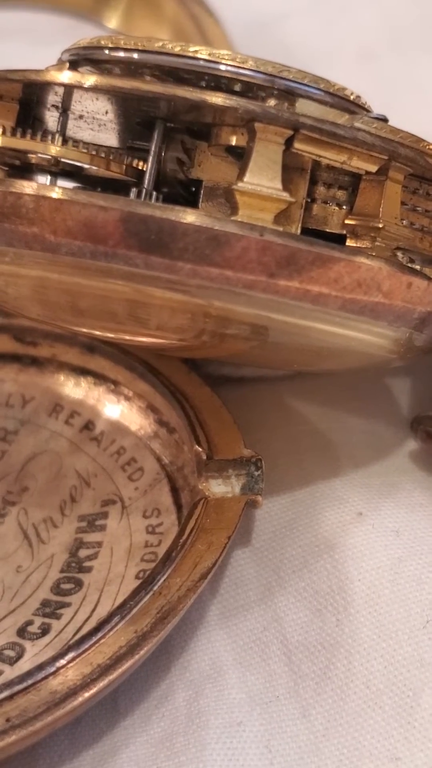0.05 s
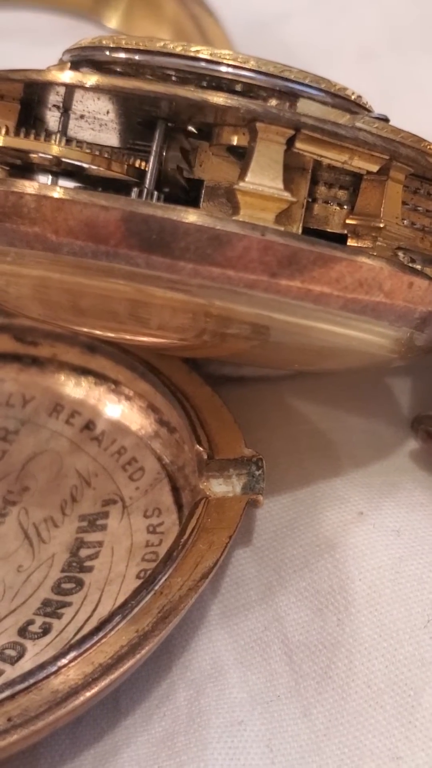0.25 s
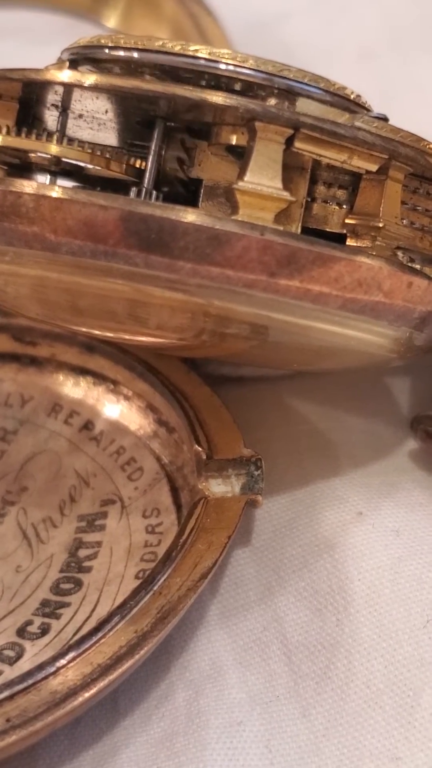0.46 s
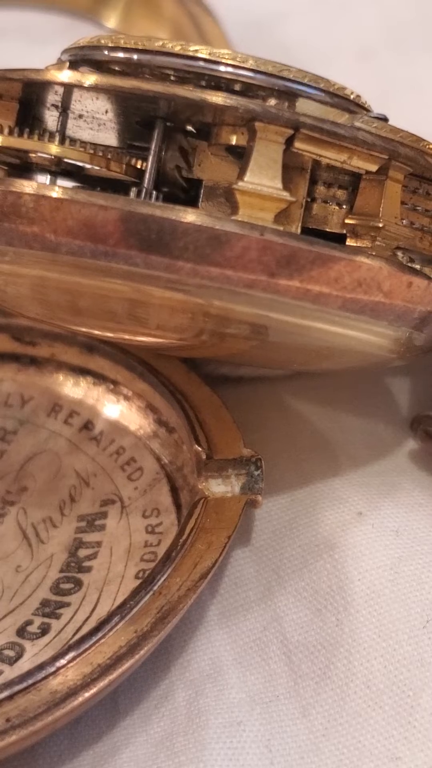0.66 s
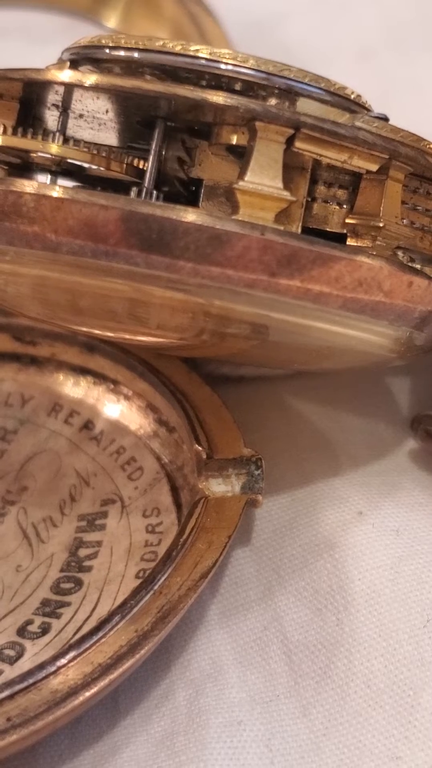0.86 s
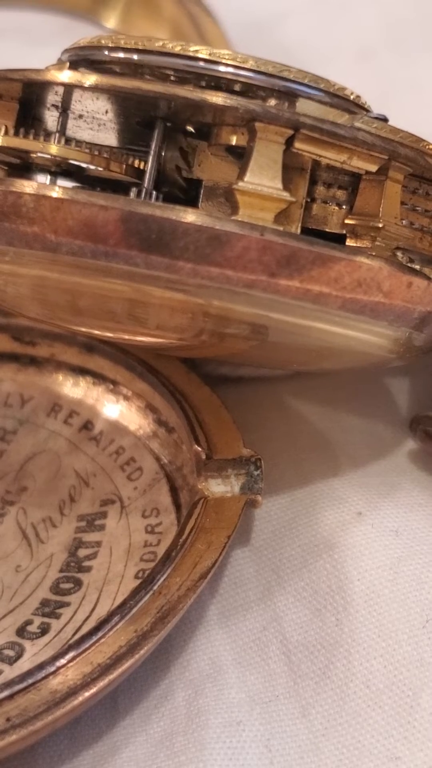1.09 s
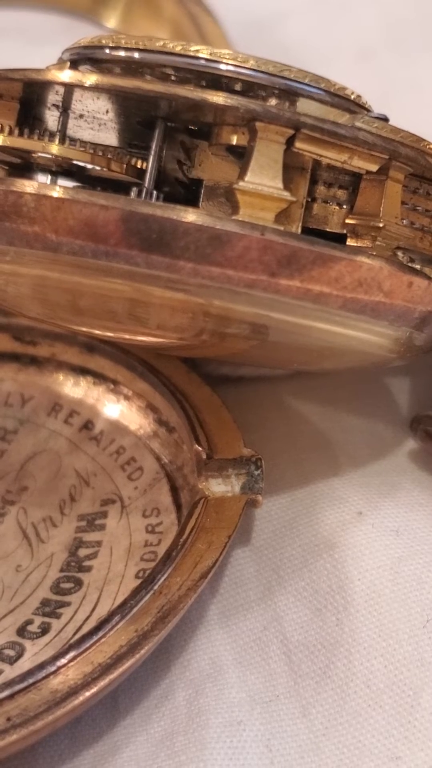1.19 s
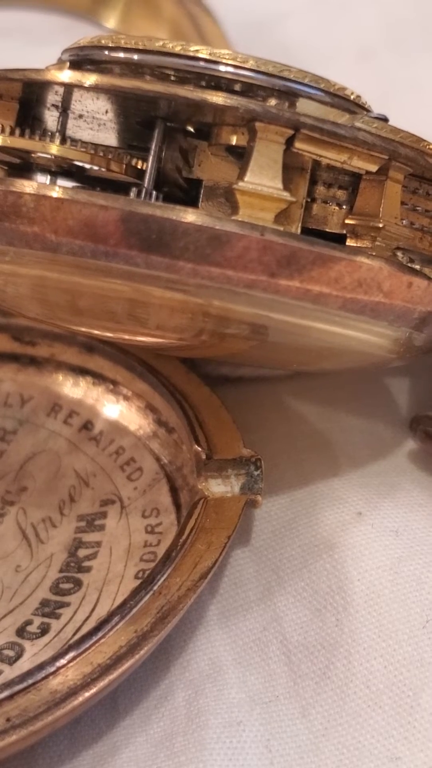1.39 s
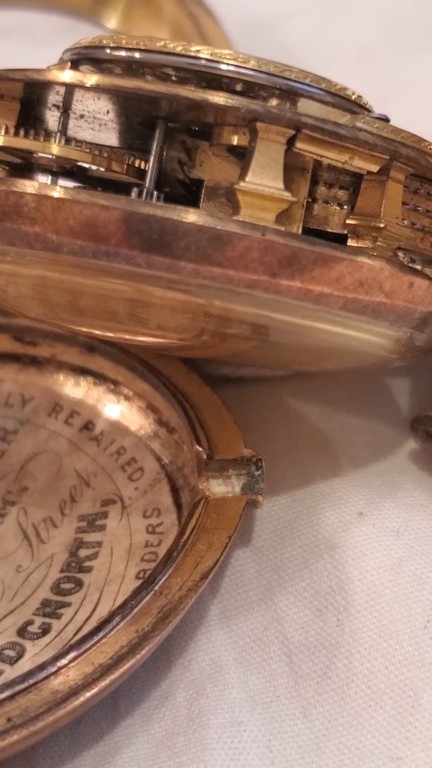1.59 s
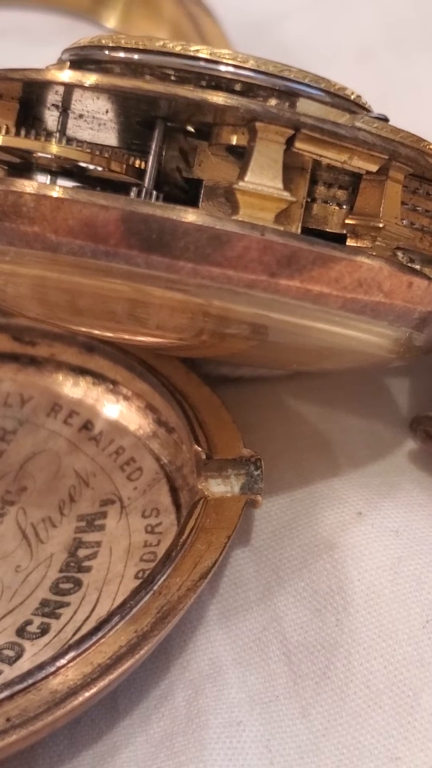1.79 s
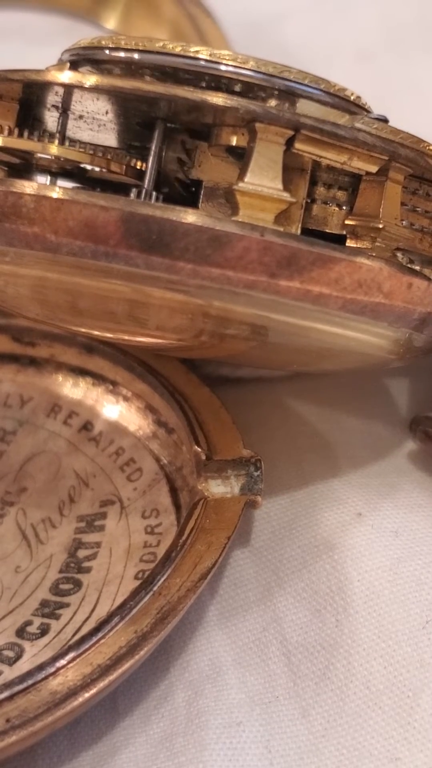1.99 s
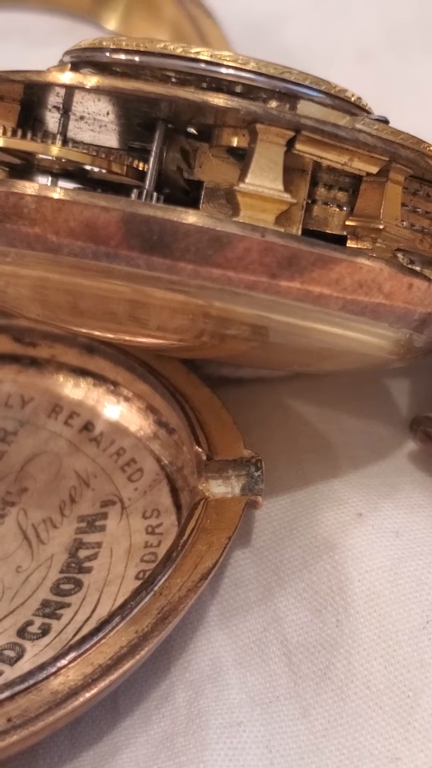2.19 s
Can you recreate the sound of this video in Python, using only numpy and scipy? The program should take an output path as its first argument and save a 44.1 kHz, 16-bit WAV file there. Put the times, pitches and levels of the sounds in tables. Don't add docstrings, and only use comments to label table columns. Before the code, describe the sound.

Pocket watch ticking close up, sharp ticks alternating with softer scraping tocks in a quiet room

```python
import sys
import numpy as np
from scipy import signal
from scipy.fft import rfft, irfft, next_fast_len
from scipy.io import wavfile
from scipy.ndimage import uniform_filter1d, map_coordinates

SR = 44100
rng = np.random.default_rng(int(sys.argv[2]) if len(sys.argv) > 2 else 0)


def decibels_to_gain(level_db):
    exponent = np.asarray(level_db, float) / 20
    return 10 ** exponent


def waveform_to_disk(signal):
    frames = np.transpose(np.atleast_2d(signal))
    scaled = np.clip(frames, -1, 1) * 32767
    samples = np.round(scaled).astype(np.int16)
    wavfile.write(sys.argv[1], SR, samples)


N = 99225
QUIET_TOP_HZ = 15800


def unit(x):
    return x / np.sqrt(np.mean(x ** 2) + 1e-20)


def along(points, hz):
    f, v = np.transpose(points)
    return np.interp(np.log(hz + 1), np.log(f + 1), v)


def curve(rows):
    return np.interp(np.arange(N) / SR, *np.transpose(rows))


def wobble(rate):
    knots = rng.standard_normal(int(N * rate / SR) + 4)
    return map_coordinates(knots, [np.arange(N) * rate / SR])


def filtered(x, response):
    m = next_fast_len(N + SR // 2)
    hz = np.fft.rfftfreq(m, 1 / SR)
    return irfft(rfft(x, m) * response(hz), m)[..., :N]


# frequency in Hz, level in dB.
DIFFUSE_TONE = [(1500, -19), (3500, -15), (5100, -16), (6700, -12.5), (8300, -6), (11000, -3.5), (13700, 4),
                (15800, -11)]


def beats(rows, body, lead_ms, step_db, lead_db, fade_db, scatter_db, trim_db, floor_db, count):
    force = np.zeros((2, N))
    draws = rng.random((len(rows), 2, count))
    for (start, peak_db, chatter_ms), (when, size) in zip(rows, draws):
        ms = -lead_ms + when * (lead_ms + chatter_ms)
        ms[0] = 0
        sliding = step_db - lead_db * ms / lead_ms
        chatter = fade_db * ms / chatter_ms
        level = np.where(ms < 0, sliding, chatter) - scatter_db * np.log10(size + 0.025)
        level[0] = 8
        level -= 10 * np.log10(np.sum(decibels_to_gain(2 * level)))
        at = np.round((start + ms / 1000) * SR).astype(int)
        for port in force:
            sign = np.sign(rng.standard_normal(count))
            np.add.at(port, at, sign * decibels_to_gain(peak_db + trim_db + level))

    def ring(f):
        total = 0
        for k, (center, width, db) in enumerate(body):
            damping = 1j * f * width
            total = total + (-1) ** k * decibels_to_gain(db) * damping / (center * center - f * f + damping)
        return total

    return filtered(force, lambda f: ring(f) + decibels_to_gain(floor_db + along(DIFFUSE_TONE, f)))


# start in seconds, peak level in dB, length of the chatter in ms.
TICK_BEATS = [
    (0.0984, -44, 5.67),
    (0.494, -44.5, 5),
    (0.8909, -41.5, 5.8),
    (1.284, -42, 5.8),
    (1.679, -41.5, 4.1),
    (2.0728, -42, 4.8),
]
# start in seconds, peak level in dB, length of the chatter in ms.
TOCK_BEATS = [
    (0.2807, -50.5, 5),
    (0.6805, -54.5, 5),
    (1.0774, -56.5, 5),
    (1.4681, -54.5, 5),
    (1.8638, -53.5, 5),
]
# frequency in Hz, width in Hz, level in dB.
TICK_PLATES = [(3350, 450, -22), (5080, 170, -8), (5900, 300, -12), (6700, 170, 2), (7900, 200, -10),
               (9250, 450, -11), (10300, 400, -8), (11300, 500, -8), (12200, 300, -3), (13000, 400, -5),
               (13600, 220, 0), (14080, 180, -1), (15200, 600, -9)]
# frequency in Hz, width in Hz, level in dB.
TOCK_PLATES = [(2150, 300, -17), (3200, 300, -14), (4800, 320, -12), (6000, 250, -11), (6850, 220, -6),
               (8900, 400, -11), (10300, 400, -12), (12300, 600, -4), (13500, 300, -2), (14050, 260, -4),
               (15200, 400, -9)]
# frequency in Hz, level in dB.
RIGHT_SHADE = [(3300, 2), (4300, -5), (5120, 5), (6000, -8), (6800, -25), (8200, -38), (10500, -23),
               (13000, -36)]


def watch():
    ticks = beats(TICK_BEATS, TICK_PLATES, lead_ms=1.8, step_db=-20, lead_db=-6, fade_db=-10,
                  scatter_db=0, trim_db=26.5, floor_db=-16.5, count=30)
    tocks = beats(TOCK_BEATS, TOCK_PLATES, lead_ms=10, step_db=-3, lead_db=-21, fade_db=-2,
                  scatter_db=-4, trim_db=28.5, floor_db=-11, count=70)
    right_lag_s = 0.000557

    def ports(hz):
        left = decibels_to_gain(-10 * (hz > QUIET_TOP_HZ)) + 0j
        right = decibels_to_gain(along(RIGHT_SHADE, hz)) * np.exp(-2j * np.pi * hz * right_lag_s)
        return np.array([left, right])

    return filtered(ticks + tocks, ports)


# frequency in Hz, time to fade by 60 dB in seconds.
ECHO_TIME = [(3000, 0.58), (6000, 0.61), (9000, 0.21), (13000, 0.27), (16000, 0.34)]
# frequency in Hz, level in dB.
ECHO_SHADE = [(3000, 0), (5000, 3), (6700, -2), (7400, -22), (8800, -22), (10500, -10), (13500, -28),
              (15500, -24)]


def room():
    delay_s, tock_db, echo_db, grain_db = 0.0068, 5, 14, 1.2
    wet = np.zeros((2, N + SR))
    sources = [(s, db) for s, db, _ in TICK_BEATS] + [(s, db + tock_db) for s, db, _ in TOCK_BEATS]
    for start, db in sources:
        hz, t, z = signal.stft(rng.standard_normal((2, SR // 2)), SR, nperseg=128)
        fade = decibels_to_gain(-60 * t / along(ECHO_TIME, hz)[:, None])
        tail = signal.istft(z * fade, SR, nperseg=128)[1][:, :SR // 2]
        first = round((start + delay_s) * SR)
        wet[:, first:][:, :SR // 2] += decibels_to_gain(db) * tail / np.linalg.norm(tail[0])
    uneven = wet[:, :N] * decibels_to_gain(grain_db * wobble(90))

    def tone(hz):
        shade = np.outer([0, 1], along(ECHO_SHADE, hz))
        return decibels_to_gain(echo_db + along(DIFFUSE_TONE, hz) + shade) * (hz < QUIET_TOP_HZ)

    return filtered(uneven, tone)


# start in seconds, pressure step in dB, rise time in ms.
LEFT_PRESSES = [
    (.2252, -5.2, .15),
    (.2601, -11.4, .46),
]


def finger():
    t = np.arange(N) / SR
    creep_ms, creep_share = 0.96, 0.67
    pull_s, pull_db, pull_ms = 1.0744, -35.5, 2.6
    low_cut_hz, low_cut_q, skin_hz = 47, 0.806, 2900

    def rise(start, ms):
        return np.exp(np.minimum(t - start, 0) * 1000 / ms)

    left = np.zeros(N)
    for start, db, ms in LEFT_PRESSES:
        quick = (1 - creep_share) * rise(start, ms)
        slow = creep_share * rise(start, creep_ms)
        left -= decibels_to_gain(db) * (quick + slow)
    right = -decibels_to_gain(pull_db) * np.exp(-((t - pull_s) * 1000 / pull_ms) ** 2)
    change = np.diff([left, right], prepend=0) * SR

    def port(hz):
        j = 1j * hz / low_cut_hz
        cut = j ** 5 / (j * j + j / low_cut_q + 1) ** 3 / (2 * np.pi * low_cut_hz)
        return cut / np.exp((hz / skin_hz) ** 2)

    return filtered(change, port)


def rustle():
    start_s, level_db, rise_s, fade_60db_s, top_hz = 0.23, -62, 0.014, 0.25, 2550
    u = np.maximum(np.arange(N) / SR - start_s, 0)
    noise = rng.standard_normal(N)
    grain = unit(filtered(noise, lambda hz: hz / (hz + 300) / (1 + (hz / top_hz) ** 4)))
    fade = decibels_to_gain(level_db - 60 * u / fade_60db_s + 3.0 * wobble(300))
    port_gain = decibels_to_gain([[0], [-14]])
    return port_gain * fade * (1 - np.exp(-u / rise_s)) * grain


# frequency in Hz, likeness from 0 to 1.
PORT_LIKENESS = [(60, 0.68), (130, 0.89), (290, 0.85), (640, 0.54), (1400, 0.0066)]
# frequency in Hz, difference in dB.
PORT_LEAN = [(60, -1), (200, -5), (380, 4.5), (700, -1.9), (1290, -5.5), (2400, -0.9)]


def rush(gain):
    def mid_side(hz):
        turn = np.arccos(np.clip(along(PORT_LIKENESS, hz), -1, 1)) / 2
        return gain(hz) * np.array([np.cos(turn), np.sin(turn)])

    mid, side = filtered(rng.standard_normal((2, N)), mid_side)
    both = unit(np.array([mid + side, mid - side]))
    return filtered(both, lambda hz: decibels_to_gain(np.outer([0.5, -0.5], along(PORT_LEAN, hz))))


def even(x, span_s):
    power = uniform_filter1d(np.mean(x ** 2, 0), round(span_s * SR))
    return x / np.sqrt(np.abs(power) + 0.041)


# time in seconds, strength in dB.
RUMBLE_LEVEL = [(0, -67), (.15, -68), (.36, -67), (.5, -72), (.65, -65.5), (.8, -74.5), (1.0, -71.5),
                (1.13, -69), (1.22, -76.5), (1.31, -69.5), (1.38, -80.5), (1.48, -81.5), (1.6, -77),
                (1.81, -77), (1.87, -70.5), (2.07, -66), (2.25, -74.5)]
# frequency in Hz, level in dB per Hz.
RUMBLE_COLOR = [(20, -34), (35, 5), (55, 13.5), (80, 8), (110, 8.5), (160, -40.5)]


def rumble():
    noise = even(rush(lambda hz: decibels_to_gain(along(RUMBLE_COLOR, hz))), span_s=0.072)
    return decibels_to_gain(curve(RUMBLE_LEVEL) + 1.56 + 3.1 * wobble(12)) * noise


# time in seconds, strength in dB.
DRONE_LEVEL = [(0, -68), (.1, -69.5), (.33, -62), (.48, -75), (.55, -67), (.65, -72), (.96, -66),
               (1.02, -72), (1.13, -66), (1.22, -75), (1.31, -64.5), (1.44, -81), (1.49, -65), (1.63, -70),
               (1.76, -65.5), (1.96, -61.5), (2.07, -72), (2.25, -68)]


def drone():
    center_hz, width_hz = 149.9, 21.3
    hum = even(rush(lambda hz: 1 / (1 + ((hz - center_hz) / width_hz) ** 2)), span_s=0.08)
    return decibels_to_gain(curve(DRONE_LEVEL)) * hum


# time in seconds, strength in dB.
DUCT_LEVEL = [(0.33, -68.5), (0.426, -71), (0.714, -69), (1.286, -71), (1.478, -69.5), (1.532, -73),
              (2.228, -70.5), (2.25, -72)]
# frequency in Hz, level in dB per Hz.
DUCT_COLOR = [(400, -17.5), (485, 2), (560, -8.5), (800, -9), (1100, -18), (1500, -23.5), (2500, -31.5),
              (4000, -53.5)]


def duct():
    noise = rush(lambda hz: decibels_to_gain(along(DUCT_COLOR, hz)))
    return decibels_to_gain(curve(DUCT_LEVEL) - 1.26 + 0.88 * wobble(9.74)) * noise


# frequency in Hz, level in dB per Hz.
AIR_COLOR = [(100, -60), (170, -13.5), (264, -3.5), (333, -7.5), (367, -5.5), (450, -15), (580, -40),
             (990, -120)]


def room_air():
    noise = rush(lambda hz: decibels_to_gain(along(AIR_COLOR, hz)))
    return decibels_to_gain(-68 + 0.07 + 0.37 * wobble(4.86)) * noise


# frequency in Hz, level in dB per Hz.
LEFT_HISS = [(1000, -1), (3000, -3), (5000, -8), (7800, -21.5), (10000, -7.5), (13500, -5), (15800, -5)]
# frequency in Hz, level in dB per Hz.
RIGHT_HISS = [(1000, -22.5), (3000, 3.5), (5000, -3), (7800, -20), (10500, -2), (13000, -0.5), (15800, -16)]
HISS_LEVEL = [-82.5, -87.5]


def hiss():
    ports = []
    for db, color in zip(HISS_LEVEL, [LEFT_HISS, RIGHT_HISS]):
        def tone(hz):
            return decibels_to_gain(along(color, hz)) * (hz > 900) * (hz < QUIET_TOP_HZ)

        ports.append(decibels_to_gain(db) * unit(filtered(rng.standard_normal(N), tone)))
    return np.array(ports)


def scene():
    background = rumble() + drone() + duct() + room_air() + hiss()
    return watch() + room() + finger() + rustle() + background


def low_pass(x):
    return signal.sosfilt(signal.butter(12, 16500, fs=SR, output="sos"), x)


def record(dry):
    top_hz = 16490
    mix = filtered(dry, lambda hz: hz < top_hz)
    return low_pass(mix)


dry = scene()
out = record(dry)
waveform_to_disk(out)
```